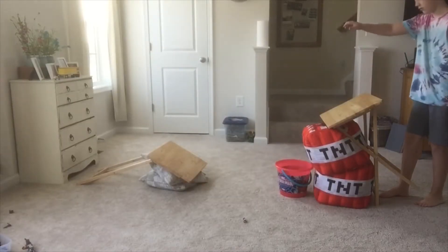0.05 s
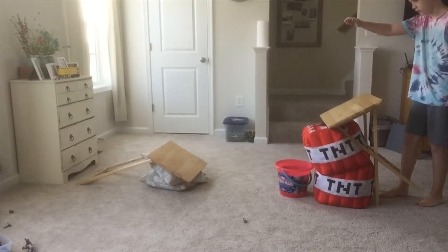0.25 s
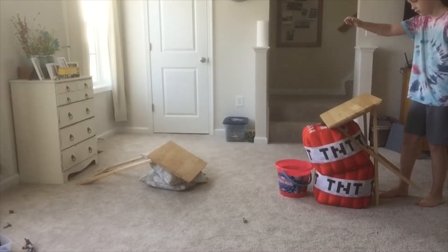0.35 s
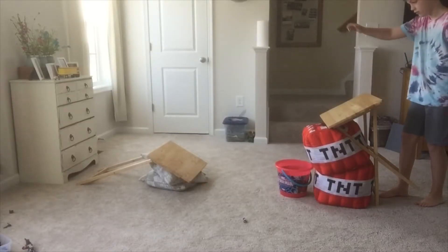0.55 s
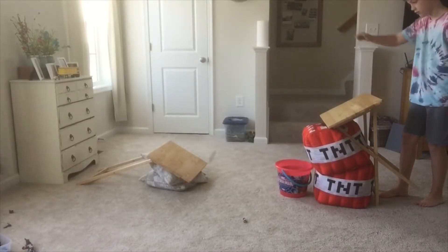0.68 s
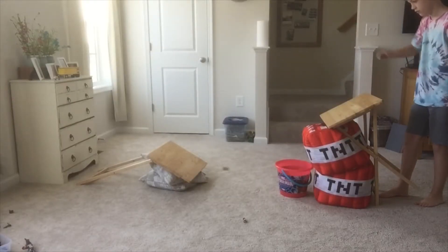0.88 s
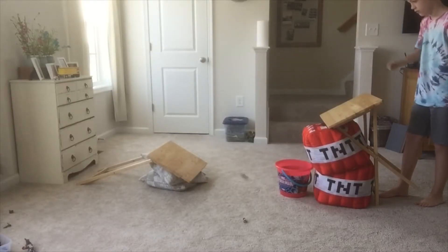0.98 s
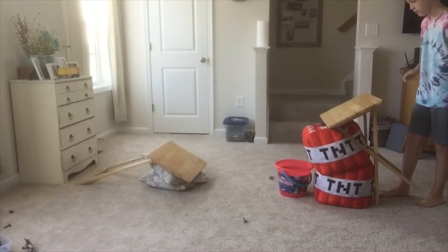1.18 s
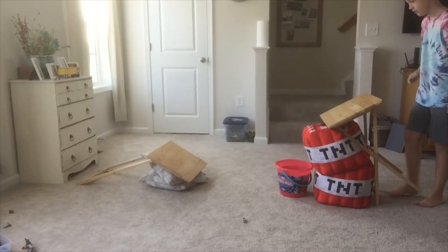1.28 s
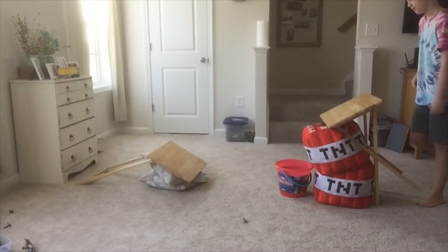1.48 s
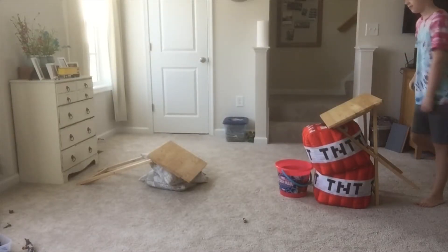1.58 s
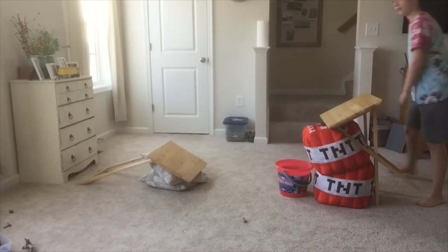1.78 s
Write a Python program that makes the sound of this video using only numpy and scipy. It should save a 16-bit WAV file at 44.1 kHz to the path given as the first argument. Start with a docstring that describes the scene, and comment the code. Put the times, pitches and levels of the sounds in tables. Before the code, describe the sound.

One hollow wooden knock rings briefly as a small ball drops on a board, heard from across a carpeted room. A much quieter bump on the carpet follows, over a low wavering hum and very faint rustles.

```python
"""A small ball drops on a propped-up wooden board: one hollow knock from the board's modes, with a bright
contact tick, early reflections and the short tail of a carpeted room. Half a second later the ball
lands on the carpet with a dull bump. Underneath: air noise, a low hum that swells and sinks,
faint rustles, one brief thin ringing room tone, and thin peeps."""
import sys
import numpy as np
from scipy import signal
from scipy.io import wavfile
from scipy.ndimage import uniform_filter1d

SR = 44100
rng = np.random.default_rng(int(sys.argv[2]) if len(sys.argv) > 2 else 0)


def to_wav(s):
    """Save 16-bit WAV."""
    ch = np.atleast_2d(s).T  # columns
    pcm = np.round(np.clip(ch, -1, 1) * 32767)  # PCM
    wavfile.write(sys.argv[1], SR, pcm.astype(np.int16))


N = 81585
TIME = np.arange(N) / SR
KNOCK_S = .2335


def from_db(db):
    """Decibels to gain."""
    return 10 ** (np.asarray(db) / 20)


def unit_rms(x):
    """Scale to unit power."""
    return x / np.sqrt(np.mean(x ** 2) + 1e-20)


def at_hz(table, hz, column=1):
    """Interpolate a table column over log frequency."""
    table = np.array(table)
    return np.interp(np.log(hz), np.log(table[:, 0]), table[:, column])


def since(start_s):
    """Seconds since start_s, zero before."""
    return np.maximum(TIME - start_s, 0)


def decay(age_s, t60_s):
    """Exponential fall, 60 dB per t60_s."""
    return np.exp(-np.log(1000) * age_s / t60_s)


def swell(start_s, length_s):
    """Quick rise to 1 at a quarter of length_s, slower fall."""
    x = since(start_s) / (length_s / 4)
    return x * np.exp(1 - x)


def butter(x, hz, kind, order=2):
    """Butterworth filter."""
    return signal.sosfilt(signal.butter(order, hz, kind, fs=SR, output="sos"), x)


def filtered_noise(cutoff_hz, kind):
    """Low- or high-passed noise, unit power."""
    return unit_rms(butter(rng.standard_normal(N), cutoff_hz, kind))


def band_noise(centre_hz, width_hz, order=2):
    """Band-passed noise, unit power."""
    edges_hz = np.clip([centre_hz - width_hz / 2, centre_hz + width_hz / 2], 10, .45 * SR)
    white = rng.standard_normal(N + SR // 4)
    return unit_rms(butter(white, edges_hz, "band", order)[-N:])


def noise_bands(spectrum):
    """Quarter-octave (centre_hz, noise) pairs under a spectrum, unit total power."""
    centres_hz = 45 * 2 ** np.arange(0, 8.6, .25)
    widths_hz = centres_hz * np.log(2) / 4
    gains = from_db(at_hz(spectrum, centres_hz)) * np.sqrt(widths_hz)
    gains /= np.linalg.norm(gains)
    return [(hz, gain * band_noise(hz, width_hz, order=5))
            for hz, width_hz, gain in zip(centres_hz, widths_hz, gains)]


def soft_tone(start_s, length_s, pitch_hz, waver_hz):
    """Short swelling sine with random pitch waver."""
    wavering_hz = pitch_hz + waver_hz * filtered_noise(61, "low")
    return swell(start_s, length_s) * np.sin(2 * np.pi * np.cumsum(wavering_hz) / SR)


def struck(modes, start_s):
    """Damped modes after one blow, neighbours in opposite polarity."""
    age_s = since(start_s)
    return sum((-1) ** k * from_db(db) * np.sin(2 * np.pi * hz * age_s) * decay(age_s, t60_s)
               for k, (hz, db, t60_s) in enumerate(modes))


# Air spectrum: freq_hz, relative_density_db
AIR_SPECTRUM = [(45, -33.5), (75, -16), (105, -15), (150, -6.5), (230, 0), (320, 3), (400, -16.5),
                (520, -17.5), (650, -28), (800, -35.5), (1200, -38), (1700, -45), (2500, -56),
                (5000, -56.5), (15000, -62)]
# Steady room tones: centre_hz, width_hz, level_db
DRONES = [(76.3, 8, -79.5), (506.6, 60, -77.5), (703.5, 9.3, -81)]


def room_air(air_db=-56, flicker_db=2.5):
    """Room noise, each band flickering separately, plus faint drones."""
    air = sum(noise * from_db(flicker_db * filtered_noise(8.7, "low"))
              for _, noise in noise_bands(AIR_SPECTRUM))
    drones = sum(from_db(db) * band_noise(hz, width_hz) for hz, width_hz, db in DRONES)
    return from_db(air_db) * air + drones


# Hum envelope: time_s, level_db
HUM_LEVELS = [(0, -64.5), (.06, -49), (.18, -65.5), (.56, -61.5), (.63, -56), (.89, -53.5), (1.1, -51),
              (1.16, -53), (1.35, -54), (1.58, -60.5), (1.68, -54.5), (1.85, -55)]
# Brief hum swells: start_s, length_s, pitch_hz, level_db
HUM_SWELLS = [(.47, .06, 305, -46), (.92, .07, 284, -39.5), (1.035, .04, 275, -46), (1.66, .08, 218, -51)]


def room_hum():
    """Low narrow-band hum that rises and sinks, with brief tonal swells."""
    noise = band_noise(centre_hz=280.9, width_hz=71.4)
    levelled = noise / np.sqrt(uniform_filter1d(noise ** 2, size=3000))
    envelope = from_db(np.interp(TIME, *np.transpose(HUM_LEVELS)))
    swells = sum(from_db(db) * soft_tone(start_s, length_s, hz, waver_hz=12.03)
                 for start_s, length_s, hz, db in HUM_SWELLS)
    return envelope * levelled + swells


def contact_tick(start_s=.231, rise_s=.002, gain_db=-54):
    """Bright noise burst as the ball meets the wood."""
    age_s = since(start_s)
    envelope = (1 - np.exp(-age_s / rise_s)) * decay(age_s, t60_s=.06)
    return from_db(gain_db) * envelope * filtered_noise(600, "high")


# Hollow low modes of board and prop: pitch_hz, gain_db, t60_s
BODY_MODES = [(226, -4, .36), (240, 7.5, .18), (260, -6.5, .42), (308, -9.7, .28), (329, -2.4, .42),
              (363, -5.6, .37), (395, 8.6, .12), (425, 5, .08), (478, 2.7, .08), (524, -13.2, .4),
              (553, 2, .12), (587, 0, .21), (588, 4, .17), (686, -16, .3)]
# First reflections off floor and wall: delay_s, gain_db
REFLECTIONS = [(.0034, -1), (.032, -7.3)]
# Woody board overtones: pitch_hz, gain_db, t60_s
OVERTONES = [(809, -13, 0.19), (852, -22.5, 0.38), (981, -14, 0.2), (1086, -15, 0.21), (1367, -35.5, 0.8),
             (1484, -24, .26), (1577, -22, 0.19), (1644, -23, .23), (1754, -23, 0.16), (1830, -21, .24),
             (1924, -14.5, .22), (2290, -30, 0.304), (2763, -28.5, .23), (3236, -25, 0.28)]


def board_knock(rise_s=.002, body_db=-24, overtones_db=-25.5):
    """Low modes build as the board flexes and return off near surfaces; overtones follow."""
    ring = struck(BODY_MODES, KNOCK_S) * (1 - np.exp(-since(KNOCK_S) / rise_s))
    reflected = sum(from_db(db) * np.interp(TIME - delay_s, TIME, ring) for delay_s, db in REFLECTIONS)
    body = butter(ring + reflected, 150, "high", order=4)
    return from_db(body_db) * body + from_db(overtones_db) * struck(OVERTONES, start_s=.237)


# Dense modes scattered by the room: freq_hz, relative_density_db, t60_s
TAIL_SPECTRUM = [(140, -20.5, .33), (233.3, -8.5, .35), (544, -1.5, 0.47), (780, -13, 0.35),
                 (1070, -9.5, 0.33), (1350, -18.5, .31), (1814, -11.5, 0.35), (2400, -19, 0.28),
                 (3214, -23, 0.33), (3740, -30, .22), (4550, -27.5, 0.24), (6000, -42, .15),
                 (9000, -49, .13), (15000, -54, 0.088)]


def room_tail(rise_s=.005, gain_db=-31, early_db=-9):
    """Diffuse ring of the knock, thickest in the early reflections; treble dies first."""
    age_s = since(KNOCK_S)
    tail = sum(noise * decay(age_s, at_hz(TAIL_SPECTRUM, hz, column=2))
               for hz, noise in noise_bands(TAIL_SPECTRUM))
    build = 1 - np.exp(-age_s / rise_s)
    early = from_db(early_db) * swell(start_s=.239, length_s=.02)
    return from_db(gain_db) * tail * (build + early)


def wall_crack(level_db=-38.5):
    """The knock's brightest part, arriving late off a wall."""
    noise = band_noise(centre_hz=2570, width_hz=2010, order=3)
    return from_db(level_db) * swell(start_s=.2415, length_s=.0062) * noise


# Faint rustles and one thin ringing room tone: start_s, length_s, centre_hz, width_hz, level_db
RUSTLES_AND_RING = [(0.478, 0.072, 3100, 600, -83.5), (.47, 0.095, 2170, 400, -80.5),
                    (0.705, 0.093, 1950, 295, -73.5), (0.782, .09, 2010, 200, -75.5),
                    (0.786, 0.046, 1120, 600, -72.5), (0.904, .06, 1584, 300, -83),
                    (1.039, 0.04, 750, 195, -72), (1.11, .3, 1362, 25, -82), (1.138, 0.101, 4550, 200, -91),
                    (1.277, 0.067, 1360, 900, -73), (1.378, 0.12, 1120, 400, -75.5),
                    (1.689, 0.19, 4700, 800, -89)]


def rustles_and_ring():
    """Swells of band noise: faint rustles, and one brief thin ringing room tone near 1360 Hz."""
    return sum(from_db(db) * swell(start_s, length_s) * band_noise(hz, width_hz, order=4)
               for start_s, length_s, hz, width_hz, db in RUSTLES_AND_RING)


# Thin peeps: start_s, length_s, pitch_hz, level_db
PEEPS = [(.48, .04, 6080, -85), (.92, .05, 1980, -81), (1.04, .03, 6100, -85), (1.15, .05, 1960, -79),
         (1.27, .05, 4600, -88), (1.29, .03, 2170, -82), (1.485, .06, 2620, -84), (1.498, .05, 6080, -81),
         (1.688, .05, 2830, -80), (1.69, .05, 5200, -84), (1.71, .04, 3280, -85)]


def peeps():
    """Faint, high, wavering tones."""
    return sum(from_db(db) * soft_tone(start_s, length_s, hz, waver_hz=24.2)
               for start_s, length_s, hz, db in PEEPS)


# Carpeted floor modes: pitch_hz, gain_db, t60_s
FLOOR_MODES = [(168.4, 1, 0.27), (370, 3, 0.1), (428, -5.5, 0.078), (552.5, -5.5, .12), (1255, -24, 0.23),
               (2830, -31.5, 0.17)]


def carpet_landing(gain_db=-47):
    """Dull bump of the ball on the carpet."""
    return from_db(gain_db) * struck(FLOOR_MODES, start_s=.788)


def scene():
    """Mono sum at one microphone across the room."""
    background = room_air() + room_hum()
    impact = contact_tick() + board_knock() + room_tail() + wall_crack()
    return (background + impact + rustles_and_ring() + peeps() + carpet_landing())[None]


def record(dry, low_cut_hz=67, high_cut_hz=15600):
    """Steep cuts of deep bass and top treble."""
    high_passed = butter(dry, low_cut_hz, "high", order=6)
    low_pass = signal.ellip(10, .2, 70, high_cut_hz, fs=SR, output="sos")
    return signal.sosfilt(low_pass, high_passed)


dry = scene()
out = record(dry)
to_wav(out)
```